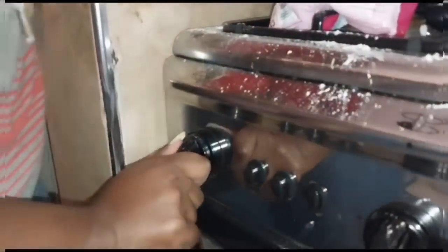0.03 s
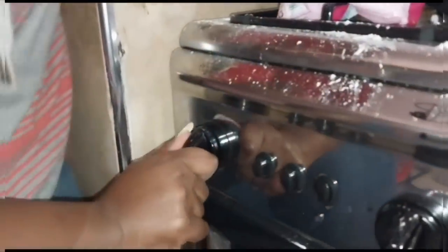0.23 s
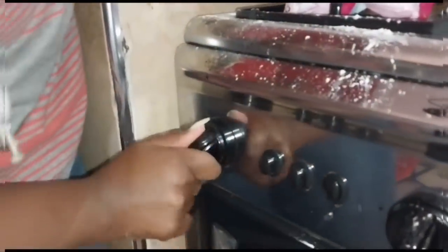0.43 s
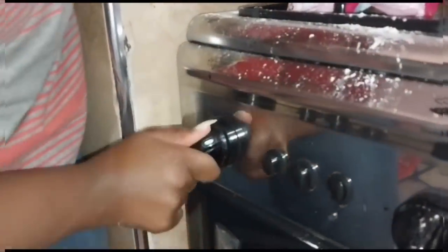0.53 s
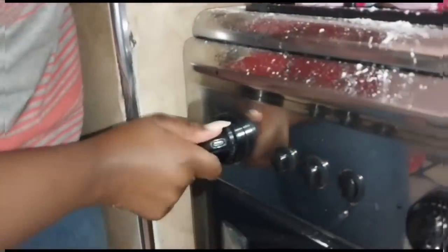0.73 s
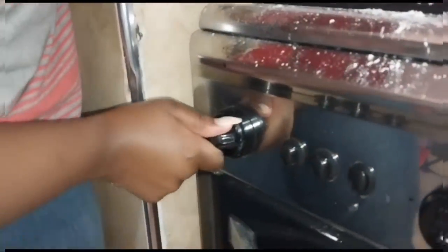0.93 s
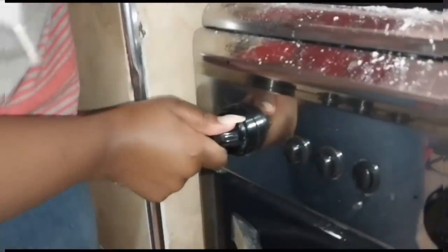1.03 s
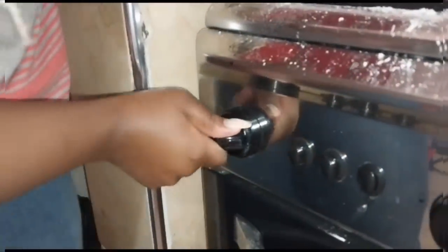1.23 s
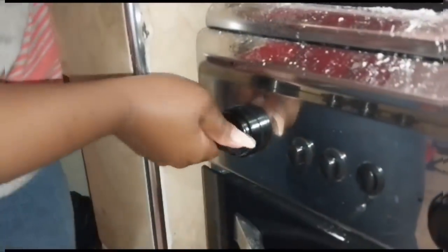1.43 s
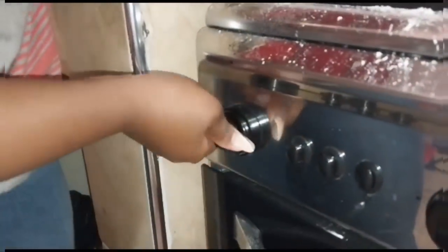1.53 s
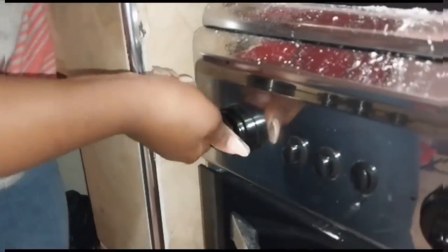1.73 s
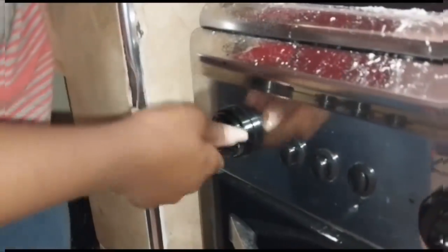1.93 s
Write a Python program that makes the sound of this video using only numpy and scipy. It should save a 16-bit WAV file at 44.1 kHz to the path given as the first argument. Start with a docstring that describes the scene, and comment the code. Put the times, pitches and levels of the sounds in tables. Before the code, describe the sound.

Small irregular clicks and one ringing snap as a hand turns an oven timer knob.

```python
"""A soft swish of a hand and one light click, then a snap: a gas cooker's mechanical timer is being wound,
close by in a small kitchen. The snap jogs the timer's bell and sets panel and sheet metal vibrating.
The mechanism slips on in small uneven clicks, each an impulse that excites spring, knob, panel and cabinet.
Friction makes the gears rasp faintly as the knob turns, and the hand swishes again between twists."""
import sys
import numpy as np
from scipy import signal
from scipy.fft import rfft, irfft
from scipy.io import wavfile
from scipy.ndimage import uniform_filter1d

SR = 44100
rng = np.random.default_rng(int(sys.argv[2]) if len(sys.argv) > 2 else 0)


def transcribe(signal):
    """Save signal, clipped to [-1, 1], as a 16-bit WAV file at the path in sys.argv[1]."""
    frames = np.atleast_2d(signal).T
    limited = np.clip(frames, -1, 1)
    pcm = np.round(limited * 32767).astype(np.int16)
    wavfile.write(sys.argv[1], SR, pcm)


N = 85995

# Reverberation time of the kitchen: f/Hz, t60/s
ROOM_T60 = [(150, 0.42), (800, 0.52), (2500, 0.24), (6000, 0.23), (15000, 0.18)]
# Left-right coherence of the diffuse field: f/Hz, coherence (0-1)
COHERENCE = [(60, 0.78), (250, 0.88), (600, 0.49), (1500, 0), (4000, 0.06)]
# Response of the farther, duller left microphone: f/Hz, gain/dB
LEFT_RESPONSE = [(60, -2), (700, -3), (1300, -4.5), (2400, -9), (4500, -10.5), (15000, -10.5)]
# Spectral densities of the noises: f/Hz, relative level/dB
AIR_SPECTRUM = [(20, -22), (45, 5), (110, 4.5), (190, 3), (400, -19), (1000, -21.5), (3000, -32.5),
                (5300, -12), (8500, -20.5), (12000, -15), (16000, -24)]
GEAR_SPECTRUM = [(60, -35.5), (160, 11.5), (230, 3), (400, 1.5), (650, -5), (1000, -1.5), (1500, 1.5),
                 (2300, 2.5), (3500, -1.5), (5300, -3.5), (8000, -15), (16000, -16.5)]
HAND_SPECTRUM = [(200, -20.5), (1000, -17), (2000, -12.5), (2900, 1.5), (3900, -2.5), (5200, 1.5),
                 (7000, -5), (8400, -10.5), (12500, -9), (16000, -17)]
SHUDDER_SPECTRUM = [(30, -19), (85, 1.5), (170, 10.5), (330, -3.5), (520, -5.5), (750, -1), (1280, -1.5),
                    (1700, -7.5), (2700, -12), (3700, -2.5), (5200, 3.5), (7100, -4.5), (8300, 2),
                    (12000, -9), (16000, -2.5)]
BOOM_SPECTRUM = [(30, -4.5), (60, -25), (110, -2.5), (155, -11), (205, 2), (270, -1.5), (360, -9),
                 (600, -20.5), (1500, -23.5)]
KNOCK_SPECTRUM = [(200, -19.5), (550, -8), (800, -6.5), (1000, 4), (1500, -4), (2200, 0.5), (3000, 6),
                  (3700, -5.5), (5000, -12)]
CRACK_SPECTRUM = [(2000, -49), (3800, -9.5), (6100, -8), (7050, 1), (8200, -13), (9600, -3.5),
                  (10500, -8.5), (12200, 4), (13600, -10), (15500, -9)]
# Envelopes of the gears' rasp and the hand's swish: t/s, level/dB
GEAR_ENVELOPE = [(0, -59), (.4, -60), (.55, -52.5), (.97, -47), (1.05, -69.5), (1.29, -59), (1.32, -42.5),
                 (1.38, -46), (1.46, -39.5), (1.62, -45), (1.68, -53.5), (1.73, -45), (1.82, -63),
                 (1.95, -77)]
HAND_ENVELOPE = [(0, -41), (.08, -48), (.14, -41.5), (.21, -42), (.3, -53), (.4, -63), (1.09, -69),
                 (1.13, -46), (1.18, -39.5), (1.24, -39), (1.3, -51.5), (1.36, -71), (1.95, -63.5)]
# Decay time of the cooker's sheet metal: f/Hz, t60/s
METAL_T60 = [(80, 1), (400, 0.8), (1500, 0.87), (5000, 0.42), (14000, 0.12)]
# Modes of the hollow front panel: f/Hz, relative level/dB, t60/s
PANEL_MODES = [(785.4, -11.5, 0.083), (909, -5.5, 0.057), (936, -10.5, 0.16), (1006, -5.5, 0.19),
               (1069, -15, 0.14), (1056, -15.5, 0.072)]
# The front panel's low tones and the bell's high partials, ringing together after the snap:
# f/Hz, relative level/dB, t60/s
SNAP_RING_MODES = [(1256, -8.5, 0.32), (1278, -12.5, 0.23), (771, -18, 0.37), (1057, -17, 0.26),
                   (2587, -0.5, 0.51), (2615, -2.5, 0.41), (3040, -1.5, 0.12), (4276, -9.5, 0.83),
                   (5158, -34, .25), (6400, -22, 0.41), (6540, -5.5, 0.18), (9070, -24, 1),
                   (11693, 1.5, 0.32), (14995, -17, 0.35)]
# Jolts of panel and bell: t/s, gain/dB
RING_JOLTS = [(.383, -17.5), (0.508, -40)]
# Slips of the mechanism, with relative levels: t/s, slip time/s, ring f/Hz, ring level/dB,
# crack level/dB, knock level/dB, panel level/dB, boom f/Hz, boom level/dB
SLIPS = [ (0.2139, 0.0017, 5145, -25.5, -22.5, -42, -44, 201.3, -50),
         (.3707, .0011, 5260, -12, -15.5, -28, -38, 100, -36),
         (0.3817, 0.0022, 5270, -24, -14, -18.5, -24.5, 150.5, -42),
         (0.4009, 0.00073, 5030, -24, -26.5, -23.5, -44, 194.2, -35.5),
         (0.4595, 0.001, 5470, -41, -28, -31, -40, 148.5, -32),
         (0.4954, 0.00098, 4900, -38, -35, -43, -61, 119.7, -38),
         (.5062, .0009, 5060, -28, -26, -32, -44, 193, -35),
         (0.5519, .0009, 4900, -25.5, -24.5, -36.5, -31.5, 213, -43),
         (.6266, 0.00081, 5560, -44.5, -27.5, -43, -34, 240.4, -37),
         (0.6694, 0.0027, 5360, -26, -26, -43, -38.5, 271.4, -41),
         (.739, 0.0014, 5040, -34, -30.5, -31.5, -35.5, 255, -41),
         (0.8262, 0.00082, 5050, -26.5, -25.5, -36, -33.5, 236.3, -37.5),
         (0.9108, 0.0024, 5725, -36, -25.5, -56, -43.5, 189.8, -45),
         (0.9463, 0.0014, 5320, -48, -28, -36, -46, 194, -43.5),
         (1.104, 0.0025, 5200, -65.5, -59, -57, -56.5, 193.5, -45.5),
         (1.178, 0.0028, 5710, -30.5, -25.5, -57, -63, 189.7, -61),
         (1.3064, 0.001, 4580, -36, -34.5, -35.5, -41, 182.7, -47.5),
         (1.3927, .0011, 5170, -28, -28, -34, -37, 190, -46),
         (1.4143, .0016, 5000, -32, -26, -44, -50, 230, -50),
         (1.4527, .0011, 5060, -29, -27.5, -33, -37, 187, -41),
         (1.502, 0.00067, 5000, -31.5, -36.5, -34, -38.5, 155.4, -45),
         (1.5474, 0.00037, 5060, -26, -27, -31, -35, 228, -44),
         (1.5579, 0.0012, 5350, -54, -31.5, -41.5, -58, 226, -49),
         (1.5925, .0011, 5120, -22.5, -21.5, -34, -42, 149, -38),
         (1.682, 0.0021, 5420, -23.5, -26.5, -42, -56, 150.8, -41.5),
         (1.867, .001, 5350, -55, -70, -79, -76, 198, -75),
         (1.9267, 0.00075, 5240, -51.5, -50.5, -59, -72, 190, -72),
         (1.9415, 0.003, 5230, -29, -31.5, -48.5, -40, 190, -65)]


def amp(db):
    """Amplitude ratio from a level in decibels."""
    return 10 ** (np.asarray(db) / 20)


def unit(x):
    """Normalisation to an rms of 1."""
    return x / np.sqrt(np.mean(x ** 2) + 1e-20)


def read(points, hz):
    """Interpolation on a logarithmic frequency axis."""
    f, value = np.transpose(points)
    return np.interp(np.log(hz + 1), np.log(f + 1), value)


def rise(rise_s, count=SR):
    """Exponential approach to full amplitude."""
    return 1 - np.exp(-np.arange(count) / SR / rise_s)


def decay(t60, count=SR):
    """Exponential damping: 60 dB lost in t60 seconds."""
    return amp(-60 * np.arange(count) / SR / t60)


def add(mix, start_s, sound):
    """Superposition: a sound joins the mix at its starting time."""
    part = mix[..., round(start_s * SR):][..., :sound.shape[-1]]
    part += sound[..., :part.shape[-1]]


def colour(x, spectrum, size=4096):
    """Minimum-phase filtering: the phase follows from the log gain by a Hilbert transform."""
    hz = abs(np.fft.fftfreq(size, 1 / SR))
    log_gain = np.log(amp(read(spectrum, hz)))
    response = np.exp(np.conj(signal.hilbert(log_gain)))
    taps = np.fft.ifft(response).real[:size // 2]
    return np.apply_along_axis(lambda v: signal.fftconvolve(v, taps)[:len(v)], -1, x)


def diffuse(count):
    """Diffuse-field white noise: coherent at two points in the bass, independent in the treble."""
    common, separate = rfft(rng.standard_normal((2, count)))
    coherence = np.clip(read(COHERENCE, np.fft.rfftfreq(count, 1 / SR)), 0, 1)
    left = coherence * common + np.sqrt(1 - coherence ** 2) * separate
    return irfft(np.array([left, common]), count)


def die_away(x, t60s, size=256):
    """Frequency-dependent damping: each band decays at its own rate."""
    hz, t, bands = signal.stft(x, SR, nperseg=size)
    damped = bands * amp(-60 * t / read(t60s, hz)[:, None])
    return signal.istft(damped, SR, nperseg=size)[1][..., :x.shape[-1]]


def sine(hz):
    """One second of simple harmonic motion in random phase."""
    return np.sin(2 * np.pi * (hz * np.arange(SR) / SR + rng.random()))


def modes(table):
    """Free vibration as a sum of damped normal modes."""
    return sum(amp(db) * decay(t60) * sine(hz) for hz, db, t60 in table)


def kitchen_air():
    """Ambient noise: the still room holds a faint, steady diffuse field."""
    return amp(-58.5) * unit(colour(diffuse(N), AIR_SPECTRUM))


def kitchen_paths(count=SR // 2):
    """Impulse response: direct sound, early scatter from cooker and hand, and reverberation."""
    scatter = diffuse(count) * decay(0.049, count) * rise(0.0016, count)
    tail = die_away(diffuse(count), ROOM_T60) * rise(0.0076, count)
    paths = (amp(-6.5) * unit(scatter) + amp(-9.5) * unit(tail)) / np.sqrt(count)
    paths[0] *= amp(3)  # the left hears more reflections, and a later, weaker direct sound
    paths[0, round(0.00004 * SR)] += 0.75
    paths[1, 0] += 1
    return paths


def friction(envelope, spectrum, grain_db, grain_s):
    """Sliding friction: noise whose strength flickers as the surfaces catch."""
    pole = np.exp(-1 / (grain_s * SR))
    flicker = unit(signal.lfilter([1 - pole], [1, -pole], rng.standard_normal(N)))
    noise = diffuse(N) * amp(grain_db * flicker)
    level_db = np.interp(np.arange(N) / SR, *np.transpose(envelope))
    return amp(level_db) * unit(colour(noise, spectrum))


def shudder(snap_s=0.383):
    """High modal density: after the snap the sheet metal rings as decaying noise."""
    out = np.zeros((2, N))
    metal = unit(colour(diffuse(SR), SHUDDER_SPECTRUM))
    add(out, snap_s, amp(-22) * rise(0.0017) * die_away(metal, METAL_T60))
    return out


def snap_ring():
    """Modal ringing of the jolted panel (low tones) and bell (high partials), unlike on the two sides."""
    out = np.zeros((2, N))
    for start_s, db in RING_JOLTS:
        right = modes(SNAP_RING_MODES)
        left = 0.73 * right + 0.88 * modes(SNAP_RING_MODES)
        add(out, start_s, amp(db) * rise(0.0095) * np.array([left, right]))
    return out


def cabinet_boom(hz):
    """Resonance: one low mode of the cabinet stands out of a dull rumble."""
    tone = amp(-2) * sine(hz)
    rumble = amp(-5) * unit(colour(diffuse(SR), BOOM_SPECTRUM))
    return rise(0.0053) * decay(t60=0.53) * (tone + rumble)


def spring_ring(slip, hz, bandwidth_hz=1040, pitch_spread=0.053):
    """A damped resonator: the spring swells with the slip and dies quickly, its pitch wavering."""
    wander = unit(uniform_filter1d(rng.standard_normal(len(slip)), size=14))
    swell = signal.lfilter([1], [1, -np.exp(-np.pi * bandwidth_hz / SR)], slip ** 2)
    pitch_hz = hz * (1 + pitch_spread * wander)
    return swell * np.sin(2 * np.pi * np.cumsum(pitch_hz) / SR)


def knob_crack(slip, grit, ring_hz):
    """A short pulse has a broad spectrum: the plastic knob cracks, in a new colour each time."""
    stretch = (ring_hz / 5100) ** 0.31  # a higher ring goes with a brighter crack
    spectrum = [(hz * stretch, db + 3 * rng.standard_normal()) for hz, db in CRACK_SPECTRUM]
    return colour(np.tanh(grit) * slip ** 0.34, spectrum)


def click(slip_s, ring_hz, ring_db, crack_db, knock_db, size=4096, attack_s=0.0069):
    """Impulsive excitation: one gritty slip rings the spring, cracks in the knob and knocks its mount."""
    t = np.arange(size) / SR
    grit, thud = rng.standard_normal((2, size))
    slip = (t / slip_s) ** 2 * np.exp(-2 * t / slip_s)
    ring = spring_ring(slip, ring_hz)
    crack = knob_crack(slip, grit, ring_hz)
    knock = colour(thud * np.exp(-t / 0.0082), KNOCK_SPECTRUM)
    paths = kitchen_paths()
    out = 0
    for part, db in [(ring, ring_db), (crack, crack_db + 2), (knock, knock_db)]:
        heard = signal.fftconvolve(part[None], paths, axes=1)
        attack = heard[1, :round(attack_s * SR)]  # its rms on the nearer side sets the level
        out += amp(db) * heard / np.sqrt(np.mean(attack ** 2) + 1e-20)
    return out


def ratchet():
    """Structure-borne sound: every slip clicks and leaves the panel and cabinet vibrating."""
    out = np.zeros((2, N))
    for start_s, *strike, panel_db, boom_hz, boom_db in SLIPS:
        add(out, start_s, click(*strike))
        add(out, start_s, amp(panel_db) * rise(0.00033) * modes(PANEL_MODES))
        add(out, start_s, amp(boom_db) * cabinet_boom(boom_hz))
    return out


def scene():
    """Superposition of all sources; the left microphone hears the whole scene quieter and duller than the
    right."""
    gears = friction(GEAR_ENVELOPE, GEAR_SPECTRUM, grain_db=1.2, grain_s=0.001)
    hand = friction(HAND_ENVELOPE, HAND_SPECTRUM, grain_db=0.3, grain_s=0.0023)
    left, right = kitchen_air() + gears + hand + ratchet() + snap_ring() + shudder()
    return np.array([colour(left, LEFT_RESPONSE), right])


def record(dry):
    """Limits of bandwidth and amplitude: a low cut, clipping at full scale, then a high cut."""
    low_cut = signal.butter(3, 30, "high", fs=SR, output="sos")
    high_cut = signal.firwin(301, 15900, window=("kaiser", 8), fs=SR)
    clipped = np.clip(signal.sosfilt(low_cut, dry), -1, 1)
    return signal.oaconvolve(clipped, high_cut[None], "same", axes=1)


dry = scene()
out = record(dry)
transcribe(out)
```